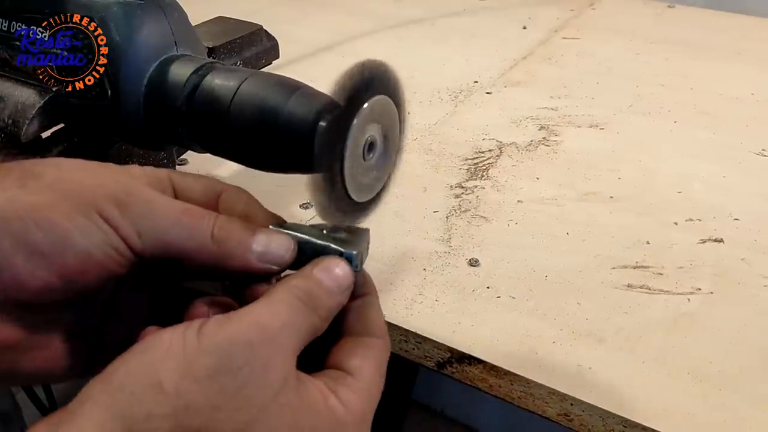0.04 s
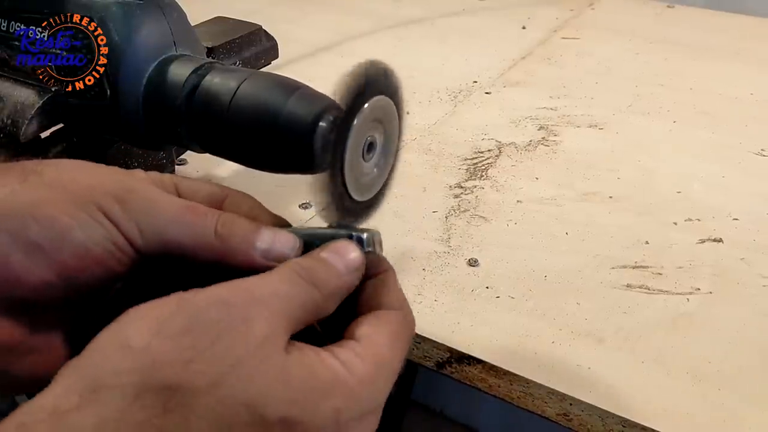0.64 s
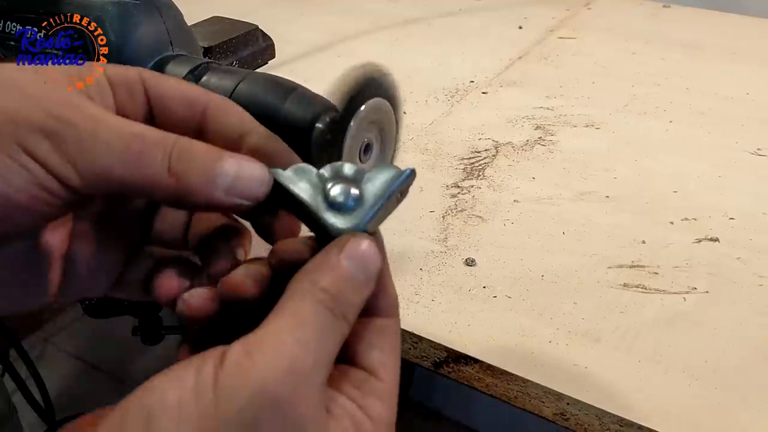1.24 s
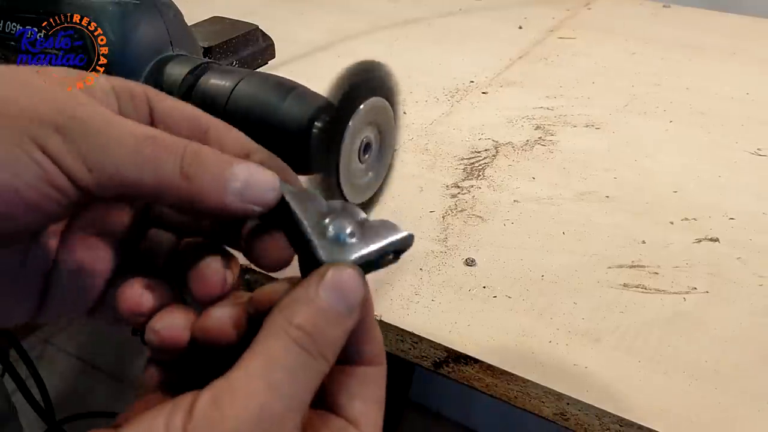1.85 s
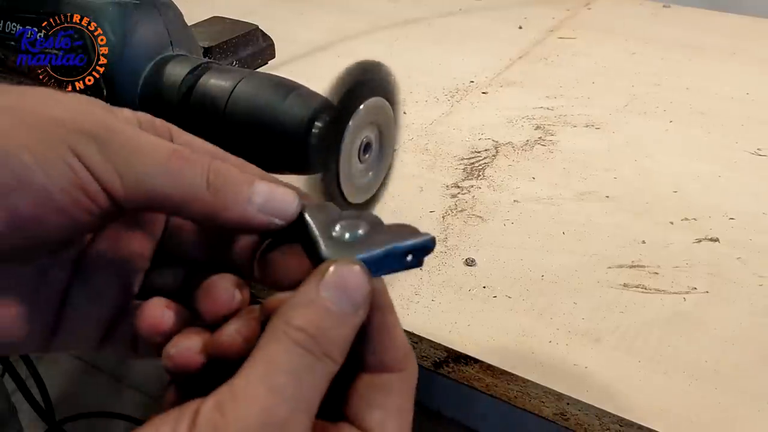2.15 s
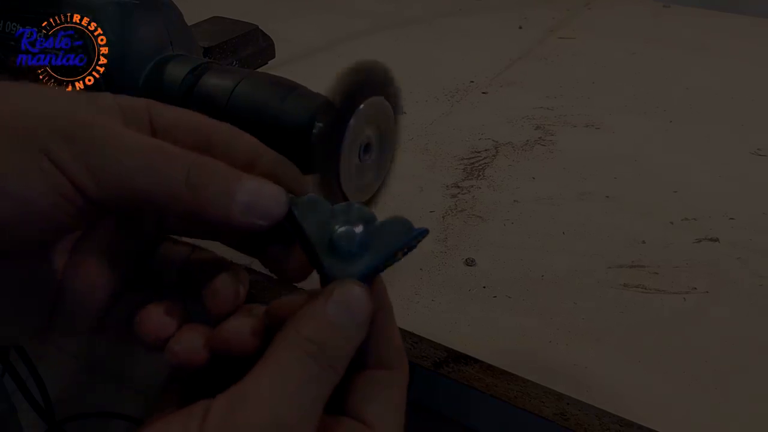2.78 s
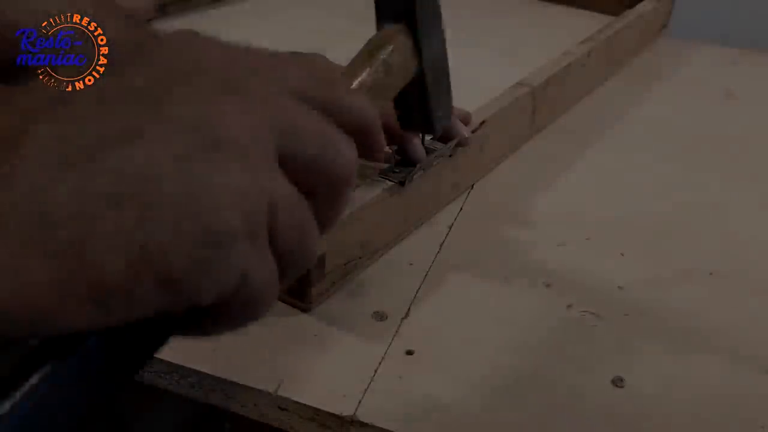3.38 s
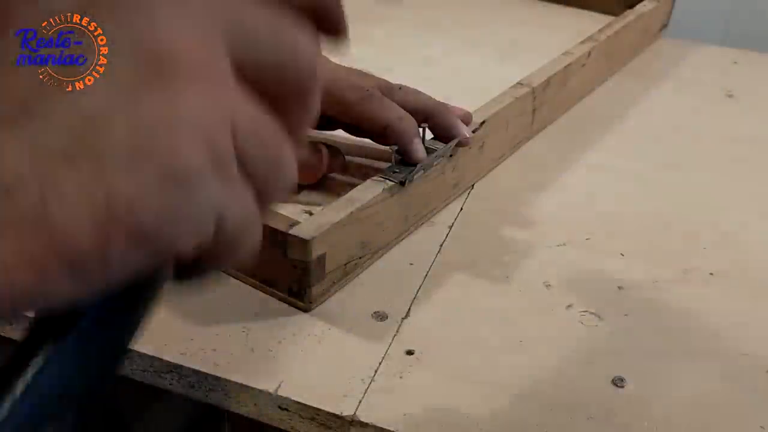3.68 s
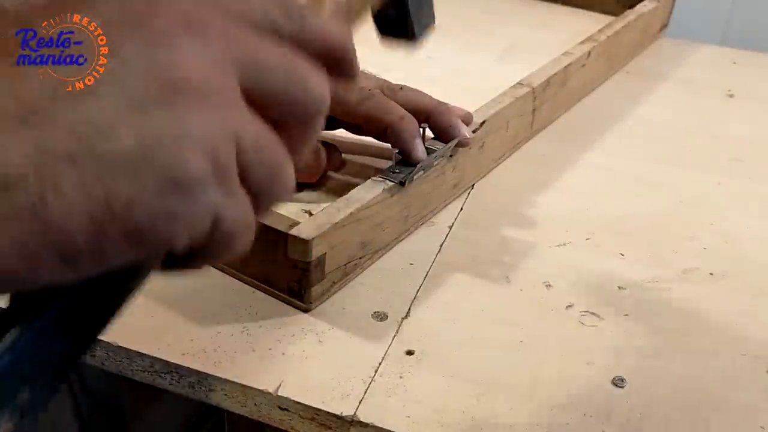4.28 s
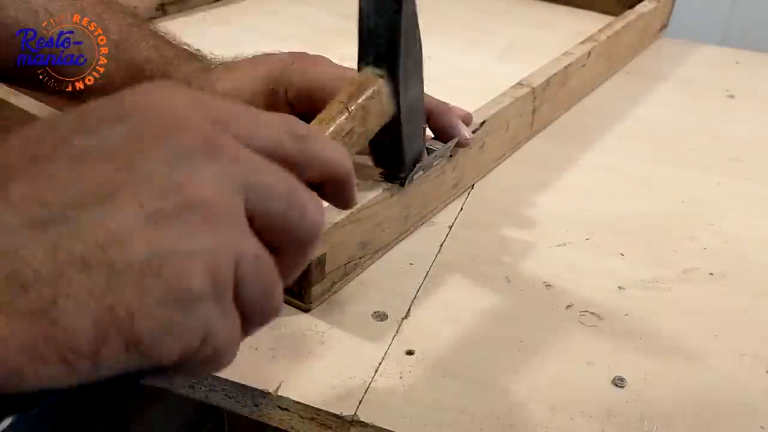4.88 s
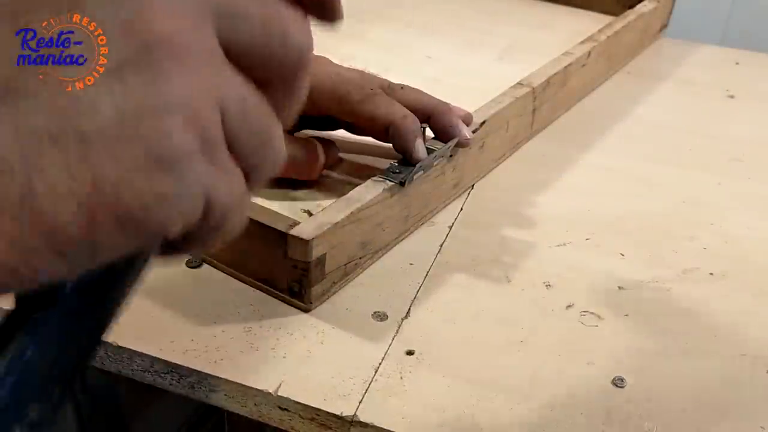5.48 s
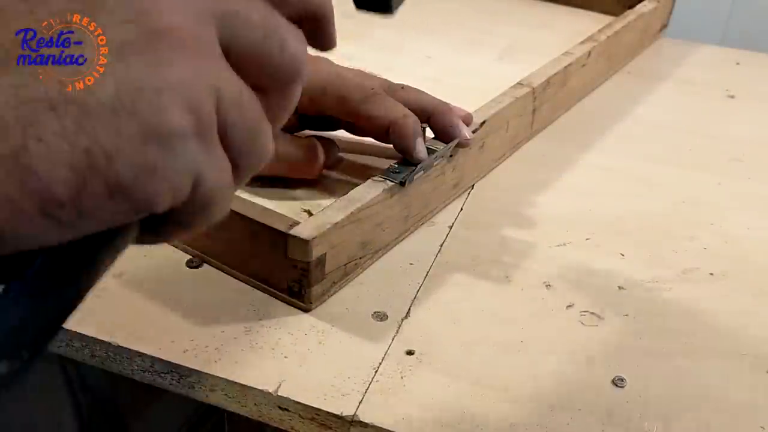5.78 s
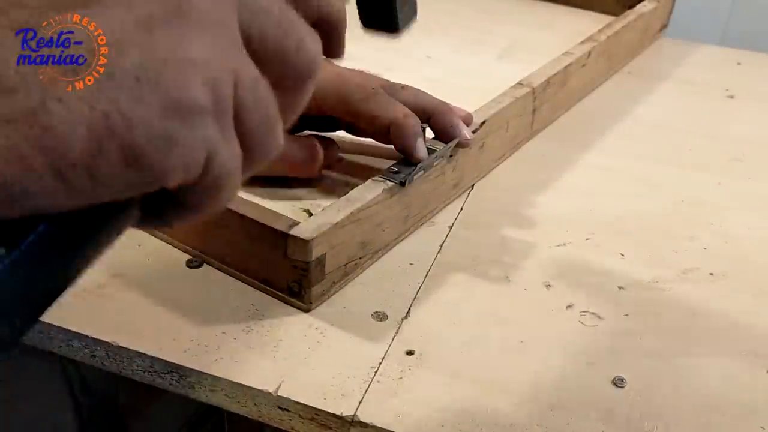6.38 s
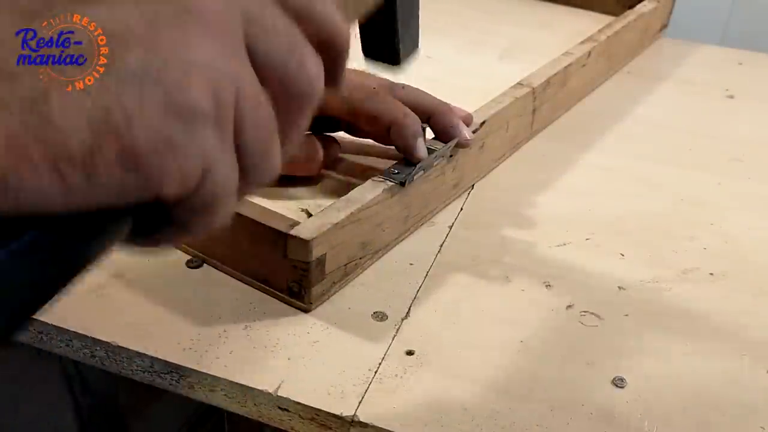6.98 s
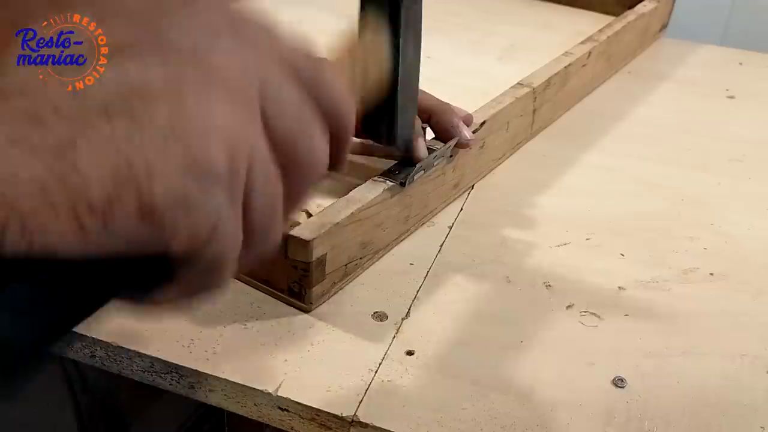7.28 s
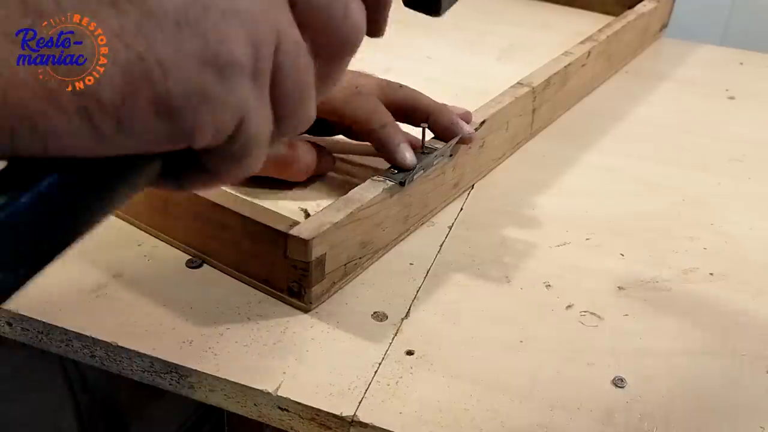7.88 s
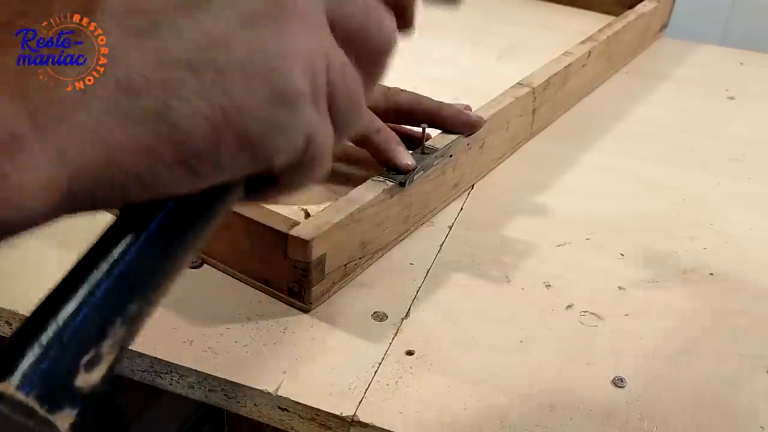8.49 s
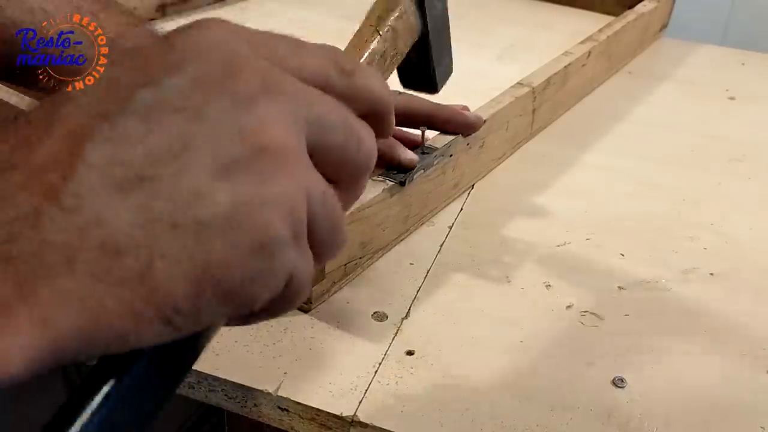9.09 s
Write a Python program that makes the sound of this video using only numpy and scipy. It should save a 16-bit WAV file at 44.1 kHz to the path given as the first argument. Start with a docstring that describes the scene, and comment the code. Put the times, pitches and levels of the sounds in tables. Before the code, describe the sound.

A spinning wire wheel whines and hisses against a metal piece, then a small hammer steadily taps nails into wood in an echoing workshop.

```python
"""Wire brushing, then nailing

A clamped drill spins a wire wheel against a small metal corner piece; its high gear whine sags under
load and, after a jump cut, climbs. The scene cuts to a small hammer tapping nails into a wooden frame
on a bench: each impact excites damped modes and the reverberation of a hard-walled workshop. A limiter
ducks at each blow and lets go a moment later, so the echo swells after the tap."""
import sys
import numpy as np
from scipy import signal
from scipy.fft import rfft, irfft, next_fast_len
from scipy.io import wavfile
from scipy.ndimage import uniform_filter1d

SR = 44100
rng = np.random.default_rng(int(sys.argv[2]) if len(sys.argv) > 2 else 0)


def generate_wav(signal):
    """Clip the signal to [-1, 1] and save it as 16-bit WAV at the path in sys.argv[1]."""
    frames = np.transpose(np.atleast_2d(signal))
    scaled = np.clip(frames, -1, 1) * 32767
    pcm = np.round(scaled).astype(np.int16)
    wavfile.write(sys.argv[1], SR, pcm)


N = 407925
TIME = np.arange(N) / SR


def from_db(db):
    """Amplitude ratio of a level in decibels."""
    return np.exp(np.asarray(db) * np.log(10) / 20)


def unit_rms(x):
    """Normalisation to rms 1."""
    return x / np.sqrt(np.mean(x ** 2) + 1e-20)


def in_time(points):
    """Linear interpolation of a curve at every sample."""
    return np.interp(TIME, *np.transpose(points))


def at_hz(points, hz):
    """Interpolation on a log-frequency axis."""
    f, value = np.transpose(points)
    return np.interp(np.log(np.maximum(hz, 1)), np.log(f), value)


def noise(spectrum, size=N):
    """Spectral shaping of white noise, rms 1."""
    padded = next_fast_len(size)
    gain = from_db(at_hz(spectrum, np.fft.rfftfreq(padded, 1 / SR)))
    return unit_rms(irfft(rfft(rng.standard_normal(padded)) * gain, padded)[:size])


def drift(rate_hz):
    """Random modulation, rms 1."""
    knots = rng.standard_normal(4000)
    return unit_rms(np.interp(TIME * rate_hz, np.arange(len(knots)), knots))


def band(x, hz, kind, order=2):
    """Butterworth low- or high-pass."""
    return signal.sosfilt(signal.butter(order, hz, kind, fs=SR, output="sos"), x)


def ring(modes, t, spread_db):
    """Modal superposition: damped sinusoids, each excited with a random strength."""
    out = np.zeros(len(t))
    for k, (hz, db, t60) in enumerate(modes):
        envelope = from_db(db + spread_db * rng.standard_normal() - 60 * t / t60)
        out += (-1) ** k * envelope * np.sin(2 * np.pi * hz * t)
    return out


# still air of the workshop: (frequency [Hz], relative spectral level [dB])
AIR_SPECTRUM = [(20, 6), (50, 3.5), (100, -7), (300, -3.5), (1200, -10.5), (3000, -24), (8000, -32),
                (16000, -34.5)]
def room_air(level_db=-65):
    """Ambient noise: a stationary floor, strongest in the bass."""
    return from_db(level_db) * noise(AIR_SPECTRUM)


# colour of the reverberation: (frequency [Hz], relative spectral level [dB])
ECHO_SPECTRUM = [(40, -20), (75, -20), (130, -11.5), (240, -2.5), (310, -6.5), (500, -4), (700, -1),
                 (1200, 0.5), (1900, -0.5), (2800, -7), (4000, -16), (6000, -23), (8200, -18.5),
                 (10000, -27.5), (15500, -20)]
# its decay by 60 dB: (frequency [Hz], T60 [s])
ECHO_DECAY = [(60, 1.9), (200, 0.72), (700, 0.72), (2000, 0.75), (5000, 0.71), (9000, 0.52), (16000, 0.31)]
def echo(t, build_s=0.021):
    """Reverberation: dense reflections build up, then decay exponentially, the treble first."""
    spectrum = rfft(noise(ECHO_SPECTRUM, size=len(t)))
    hz = np.fft.rfftfreq(len(t), 1 / SR)
    centres, t60s = np.transpose(ECHO_DECAY)
    out = np.zeros(len(t))
    for one_band, t60 in zip(np.eye(len(centres)), t60s):
        share = at_hz(np.column_stack([centres, one_band]), hz)
        out += irfft(spectrum * share, len(t)) * from_db(-60 * t / t60)
    return out * (1 - np.exp(-t / build_s))


# rush of the motor fan: (frequency [Hz], relative spectral level [dB])
FAN_SPECTRUM = [(24, -34), (40, -4.5), (84, -8.5), (119, -2.5), (223, -10.5), (334, -16.5), (384, -6.5),
                (425, -10.5), (624, -7), (764, -17), (935, -7), (2230, -10.5), (2570, -12), (4340, -17),
                (5000, -22), (6500, -53), (11000, -120)]
def fan_rush(pressing, level_db=-56.5, load_db=4.5):
    """Broadband flow noise, louder under load."""
    return noise(FAN_SPECTRUM) * from_db(level_db + load_db * pressing)


# hiss of the wire tips: (frequency [Hz], relative spectral level [dB])
WIRE_SPECTRUM = [(2500, -31), (4500, -6.5), (7000, 0), (7900, 4), (8350, 16), (8900, 0.5), (10000, -2.5),
                 (12300, -5), (14000, 0), (15500, -1), (16500, -13)]
def wire_hiss(pressing, level_db=-54.0, load_db=4.5, turn_hz=47, swing=0.11, grain_db=0.5):
    """Friction noise: the wires hiss a little harder once a turn and much harder against the metal."""
    turning = 1 + swing * np.sin(2 * np.pi * turn_hz * TIME)
    hiss = noise(WIRE_SPECTRUM) * turning
    return hiss * from_db(level_db + load_db * pressing + grain_db * drift(400))


# lesser motor tones: (rotor multiple before rounding [1], loaded level [dB], free level [dB])
MOTOR_HARMONICS = [(1, -69.5, -72), (3, -67, -76), (12, -68, -67), (24, -64, -75.5), (36, -63.5, -68),
                   (38, -73, -99), (40, -78, -58.5), (48, -80, -81), (60, -66, -71), (72.8, -62, -65),
                   (71.3, -56, -63)]
def motor_tones(rotor, load, waver_db=2.0, hum_hz=120.5, hum_db=-63):
    """Harmonics of the rotation, plus a housing hum that emerges as the load eases."""
    load = np.clip(load, 0, 1)
    out = np.zeros(N)
    for multiple, loaded_db, free_db in MOTOR_HARMONICS:
        db = load * loaded_db + (1 - load) * free_db
        out += from_db(db + waver_db * drift(9.11)) * np.sin(round(multiple) * rotor)
    hum = from_db(hum_db + waver_db * drift(6.1)) * np.sin(2 * np.pi * hum_hz * TIME)
    return np.sqrt(2) * (out + (1 - load) * hum)


def whine_pitch(working_hz=8334, sagged_hz=8243, after_cut_hz=8368, free_hz=8522):
    """Load torque slows the motor; at a jump cut the whine steps up, then climbs toward free speed."""
    push_s, sag_s = .37, .4
    jump_cut_s, step_s, climb_s = .96, .025, .8
    pushed = np.sin(np.pi / 2 * np.clip((TIME - push_s) / sag_s, 0, 1))
    working = working_hz + (sagged_hz - working_hz) * pushed
    free = free_hz + (after_cut_hz - free_hz) * np.exp(-np.maximum(TIME - jump_cut_s, 0) / climb_s)
    after_cut = np.clip((TIME - jump_cut_s) / step_s + .5, 0, 1)
    return working + (free - working) * after_cut


# strength of the whine, shifting as hands and metal move about the wheel: (time [s], level [dB])
WHINE_LEVEL = [(0.0, -45.5), (0.24, -39), (0.54, -42.5), (0.56, -37), (0.68, -37.5), (0.72, -43),
               (0.94, -36), (0.97, -47), (1.06, -50), (1.19, -42), (1.59, -39.5), (1.65, -45.5),
               (1.77, -43), (1.99, -52.5), (2.14, -45.5), (2.59, -51), (3.04, -48), (3.08, -56)]
def gear_whine(phase, mains, load, gain_db=0.5, shimmer_db=0.5, judder_db=0.5):
    """Amplitude modulation: mains pulses make the gear tone flutter, scraping makes it judder."""
    level = in_time(WHINE_LEVEL)
    strong_db, strong_depth, growth = -37, 0.14, 1.13  # the flutter deepens as the whine fades
    depth = np.minimum(strong_depth * from_db(growth * (strong_db - level)), 1)
    flutter = (1 + depth * np.cos(mains)) / np.sqrt(1 + depth ** 2 / 2)
    unsteady_db = shimmer_db * drift(150) + judder_db * load ** 2 * drift(32.6)
    return np.sqrt(2) * from_db(level + gain_db + unsteady_db) * flutter * np.sin(phase)


# how hard the wires scrape the metal: (time [s], load [1 = steady brushing])
WHEEL_LOAD = [(0, 1), (.35, 1), (.43, 1.53), (.48, 0.86), (.58, 1.1), (.63, 0.52), (.8, 0.33), (.97, 0.46)]
def drill(whine_order=39, mains_hz=50, wobble_rad=0.41, jitter_hz=1.6, uneven=0.1):
    """Rotating machinery: tones locked to the rotor, phase-modulated by the mains, over noise."""
    load = in_time(WHEEL_LOAD)
    mains = 2 * np.pi * mains_hz * TIME
    pitch = whine_pitch() + jitter_hz * drift(40.4)
    phase = 2 * np.pi * np.cumsum(pitch) / SR + wobble_rad * np.cos(mains)
    tones = gear_whine(phase, mains, load) + motor_tones(phase / whine_order, load)
    pressing = load * (1 + uneven * drift(30.1))
    return tones + wire_hiss(pressing) + fan_rush(pressing)


# the hammer head set down lightly: (time [s], gain [dB])
LIGHT_CONTACTS = [(8.148, -55), (9.067, -26)]
# its clack: (frequency [Hz], level [dB], T60 [s])
CLACK_MODES = [(960, -18, 0.035), (1360, -8, 0.067), (1780, -15, 0.022), (2090, -4.5, .022),
               (2740, -10, .03), (3950, -24, .03)]
def hammer_touches(echo_db=-21, scuff_db=-16, scuff_s=0.0062):
    """Weak impacts excite a heavily damped clack, a scuff and a little reverberation."""
    t = np.arange(SR) / SR
    out = np.zeros(N + len(t))
    for s, db in LIGHT_CONTACTS:
        scuff = from_db(scuff_db) * band(rng.standard_normal(len(t)), 6300, "low") * np.exp(-t / scuff_s)
        tail = from_db(echo_db) * band(echo(t), 650, "high") * np.exp(-t / 0.18)
        start = round(s * SR)
        out[start:start + len(t)] += from_db(db) * (ring(CLACK_MODES, t, spread_db=1.5) + scuff + tail)
    return out[:N]


# long resonances of bench and room: (frequency [Hz], level [dB], T60 [s])
BENCH_MODES = [(28, -48, 0.69), (39.8, -54, 0.58), (84, -46.5, 1.03), (104.1, -41, 1.6), (150, -39.5, 0.85),
               (374.6, -37.5, 0.72), (236.8, -38, 0.8), (260.4, -45, 0.91), (425, -37, 0.89),
               (624, -31.5, 0.68), (839, -42.5, 0.49), (877, -38.5, 0.84), (927, -29, 0.68),
               (973, -32, 0.76), (1123, -28.5, 0.75), (1248, -35, 0.51), (1403, -34.5, 0.83),
               (1870, -37, 0.6), (2546, -35.5, 0.76)]
def bench_and_room(t, common_echo, bass_db, echo_db=-16, bass_hz=400):
    """Free decay of modes and echo; half the echo's power changes with the hand and the blow."""
    tail = from_db(echo_db) * (common_echo + echo(t)) / np.sqrt(2) + ring(BENCH_MODES, t, spread_db=3.0)
    return tail + (from_db(bass_db) - 1) * band(tail, bass_hz, "low", order=1)


# the wooden frame's knock: (frequency [Hz], level [dB], T60 [s])
FRAME_MODES = [(230, -22.5, 0.015), (353, -29, 0.031), (877, -17.5, 0.051), (1144, -11.5, 0.027),
               (1614, -11, 0.013), (1926, -18.5, 0.081), (2804, -14, 0.012), (3860, -25, 0.031),
               (4760, -28, 0.016)]
def frame_knock(t, detune=0.041):
    """Heavily damped modes of wood, their pitch shifted by the hand's grip."""
    return ring(FRAME_MODES, t * (1 + detune * rng.standard_normal()), spread_db=4.0)


def steel_crack(t, contact_s=0.00017, tick_db=-12, tick_s=0.00067, split_hz=3600):
    """Brief contact of steel on the nail gives a broad spectrum: a pulse below, a noisy tick above."""
    pulse = band((1 - t / contact_s) * np.exp(-t / contact_s), split_hz, "low")
    tick = band(rng.standard_normal(len(t)), split_hz, "high") * np.exp(-t / tick_s)
    return pulse + from_db(tick_db) * tick


# ring of the hammer head, varying with how squarely it lands: (frequency [Hz], level [dB], T60 [s])
HEAD_MODES = [(12340, -51, .6), (14300, -50, .55)]
# blows on the nails: (time [s], gain [dB], treble gain [dB], centre of a narrow treble peak [Hz])
HAMMER_BLOWS = [(2.85, -14, -6, 9400), (3.37, -11.5, -4, 9350), (3.8135, -9, -4, 9400),
                (4.2154, -7.5, 0, 15500), (4.5834, -8, -1.5, 15400), (4.9312, -8.5, 0, 15700),
                (5.274, -10, 4, 14700), (5.6345, -9.5, 2.5, 14250), (5.968, -9, 2, 14250),
                (6.2736, -8, 2, 14250), (6.5617, -6.5, 3, 15800), (6.839, -6.5, 5, 14100),
                (7.1058, -6, 1.5, 14100), (7.373, -5.5, 1, 14900), (7.6558, -4.5, 0.5, 14500),
                (8.393, -14.5, -0.5, 15300), (8.7548, -9, -1.5, 15000)]
def hammer(usual_db=-9.5, bright_hz=3200, peak_db=7.5, peak_half_width_hz=71):
    """Impulse excitation: each blow cracks on the nail and sets frame, head, bench and room ringing."""
    t = np.arange(3 * 2 ** 14) / SR
    hz = np.fft.rfftfreq(len(t), 1 / SR)
    treble = hz ** 4 / (hz ** 4 + bright_hz ** 4)
    fade = np.minimum(1, 10 * (t[-1] - t))
    common_echo = echo(t)
    out = np.zeros(N + len(t))
    for s, db, bright_db, peak_hz in HAMMER_BLOWS:
        lighter_db = usual_db - db  # light taps are rounder, and their treble peak stands out more
        blow = steel_crack(t) + bench_and_room(t, common_echo, bass_db=max(lighter_db, 0))
        blow += frame_knock(t)
        # a firmly seated nail gives a brighter blow; one narrow high peak colours each blow
        peak_shape = 1 / (1 + 1j * (hz - peak_hz) / peak_half_width_hz)
        treble_peak = 1 + (from_db(peak_db + 2 * lighter_db) - 1) * peak_shape
        blow = irfft(rfft(blow) * from_db(bright_db * treble) * treble_peak, len(t))
        blow += from_db(bright_db) * ring(HEAD_MODES, t, spread_db=11.0)
        start = round(s * SR)
        out[start:start + len(t)] += from_db(db) * blow * fade
    return out[:N]


def limiter(x, ceiling_db=-22.0, sense_hz=9000, ahead_s=.007, hold_s=.096):
    """Look-ahead limiting: the gain ducks before a peak, holds, then lets go at once."""
    block = SR // 1000
    sensed = np.abs(band(x, sense_hz, "low", order=1))
    peaks = np.pad(sensed, (0, -len(x) % block)).reshape(-1, block).max(axis=1)
    ceiling, ahead = from_db(ceiling_db), round(ahead_s * SR / block)
    held, age, gains = ceiling, 0, np.ones(len(peaks))
    for i in range(len(peaks)):
        coming = max(peaks[i:i + ahead].max(), ceiling)
        age += block / SR
        depth = min(held / ceiling - 1, 1)  # a shallow duck is held only briefly
        if coming > held or age > hold_s * depth + ahead_s:
            held, age = coming, 0
        gains[i] = ceiling / held
    return x * uniform_filter1d(np.repeat(gains, block)[:len(x)], size=2 * block)


def scene(cut_s=3.081, fade_s=.004):
    """A rapid crossfade from drill to hammer; only the tail of the first blow is heard."""
    crossfade = np.clip((TIME - cut_s) / fade_s, 0, 1)
    brushing = drill()
    nailing = hammer() + hammer_touches() + room_air()
    return ((1 - crossfade) * brushing + crossfade * nailing)[None]


def record(dry, cutoff_hz=15900):
    """Peak limiting, then band limiting by a steep elliptic low-pass."""
    low_pass = signal.ellip(10, .1, 70, cutoff_hz, fs=SR, output="sos")
    return signal.sosfilt(low_pass, limiter(dry[0]))[None]


dry = scene()
out = record(dry)
generate_wav(out)
```